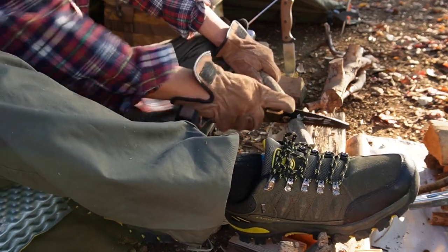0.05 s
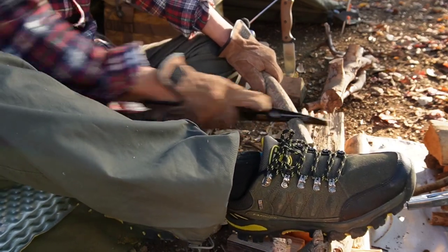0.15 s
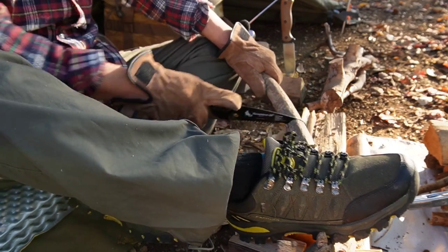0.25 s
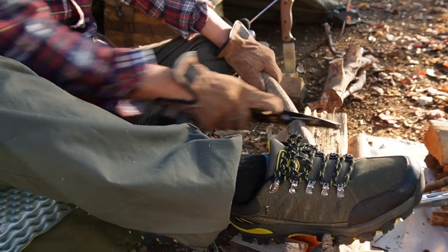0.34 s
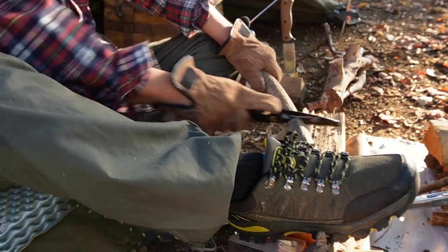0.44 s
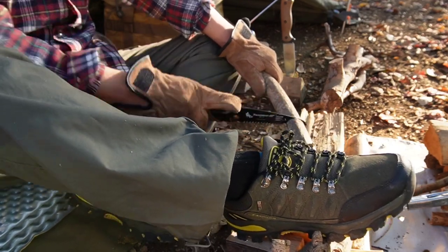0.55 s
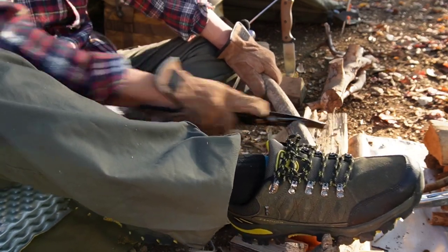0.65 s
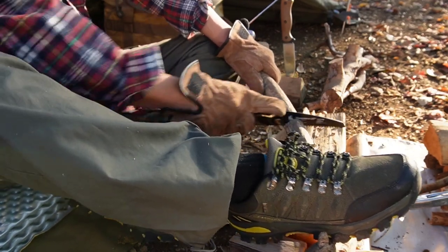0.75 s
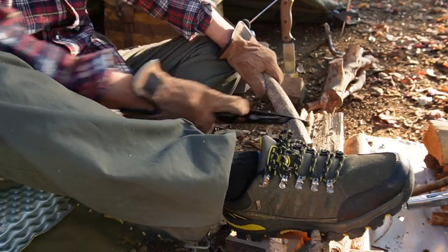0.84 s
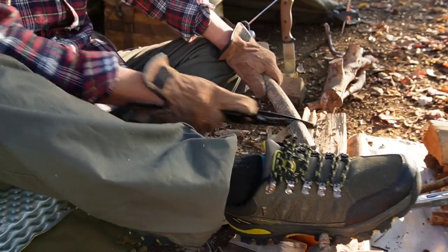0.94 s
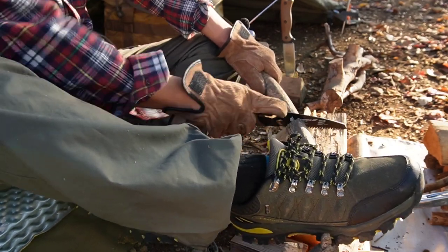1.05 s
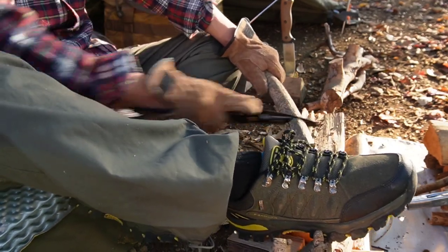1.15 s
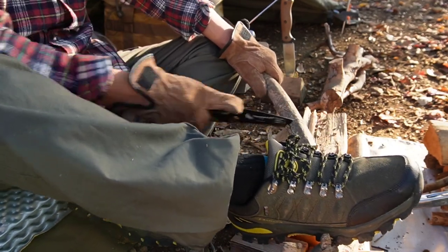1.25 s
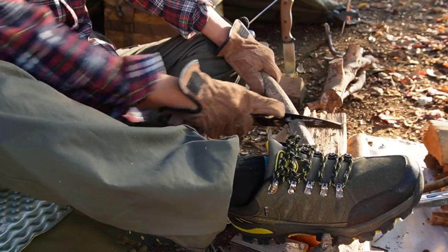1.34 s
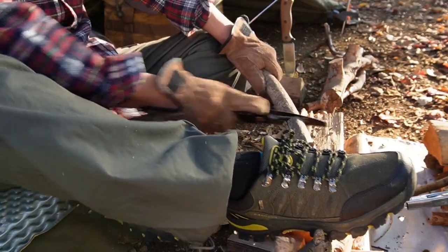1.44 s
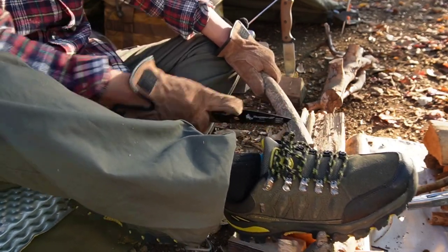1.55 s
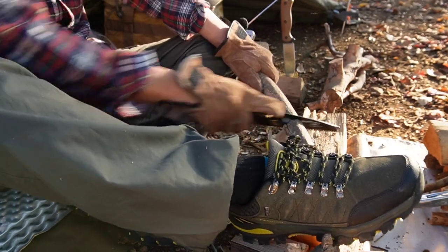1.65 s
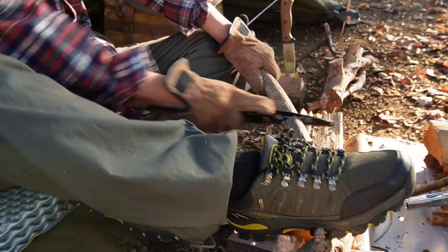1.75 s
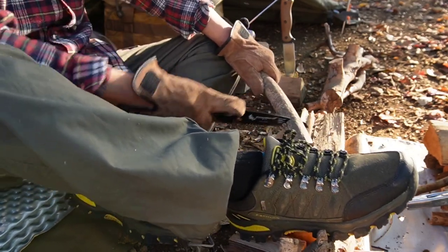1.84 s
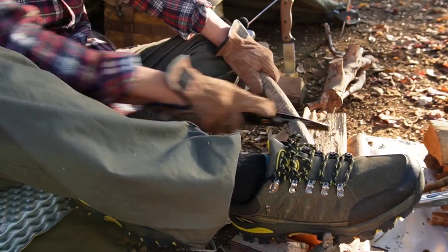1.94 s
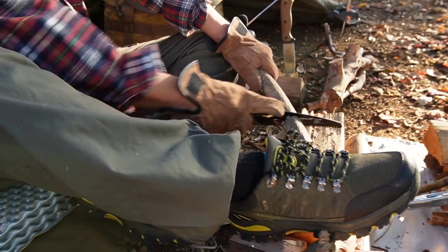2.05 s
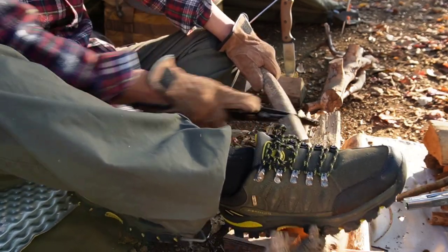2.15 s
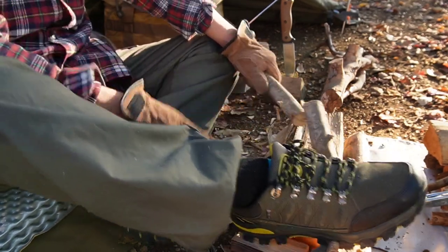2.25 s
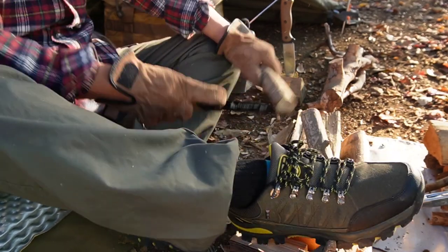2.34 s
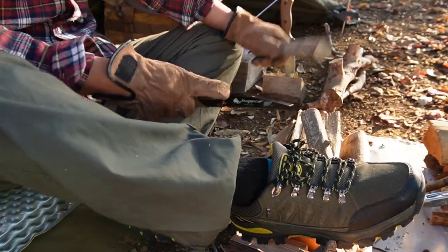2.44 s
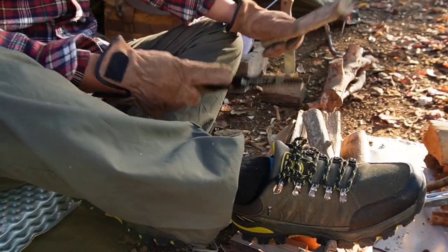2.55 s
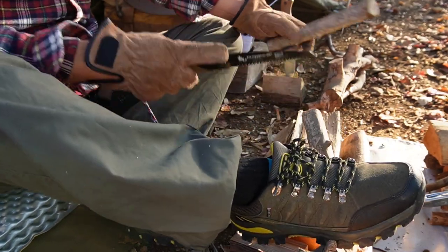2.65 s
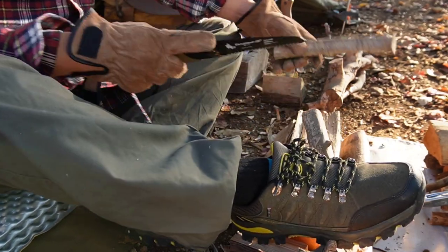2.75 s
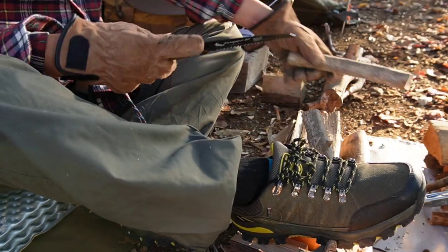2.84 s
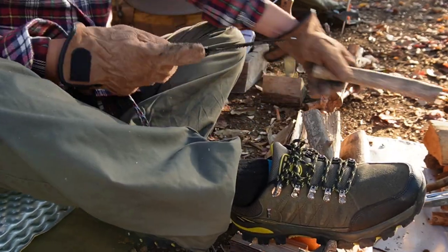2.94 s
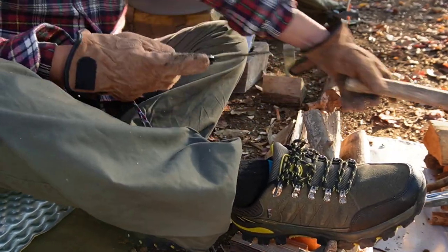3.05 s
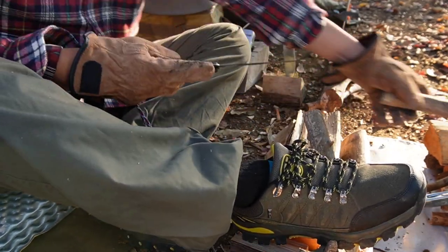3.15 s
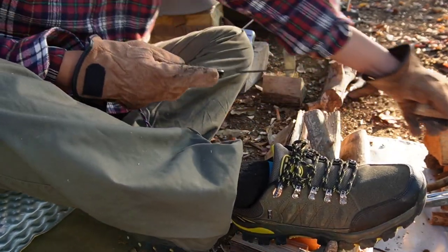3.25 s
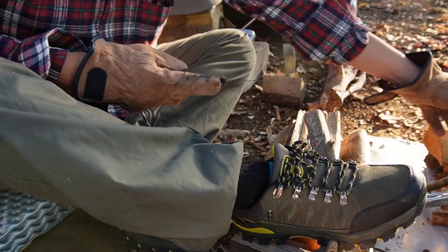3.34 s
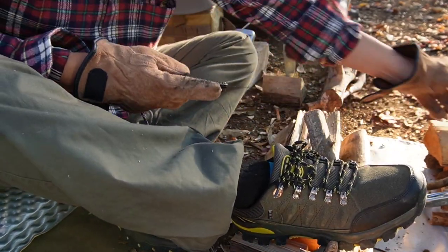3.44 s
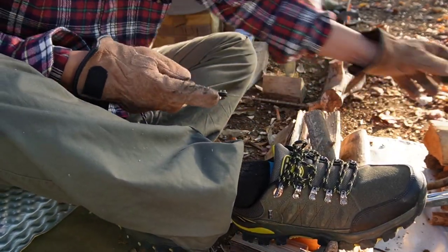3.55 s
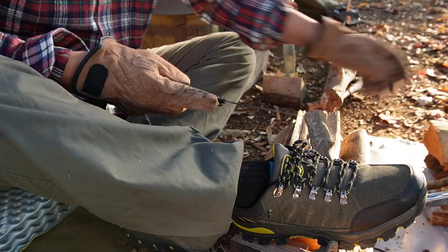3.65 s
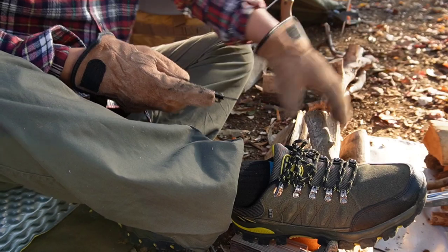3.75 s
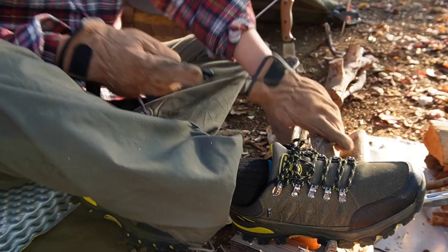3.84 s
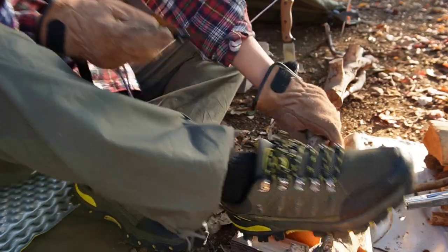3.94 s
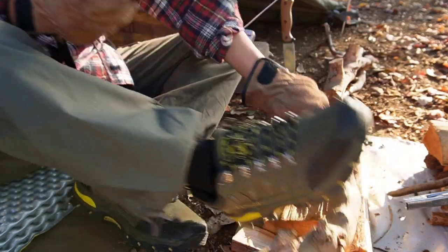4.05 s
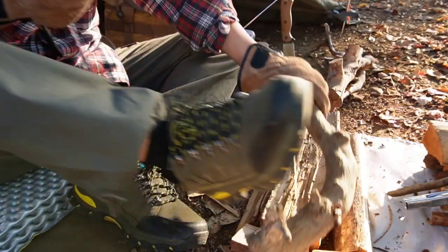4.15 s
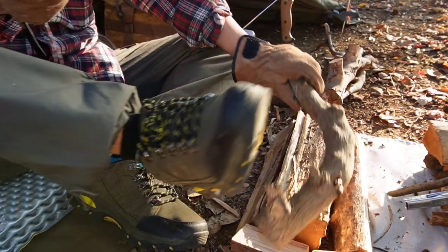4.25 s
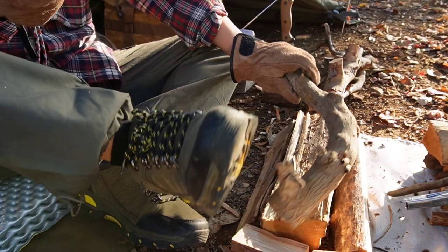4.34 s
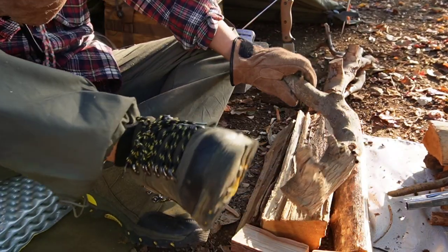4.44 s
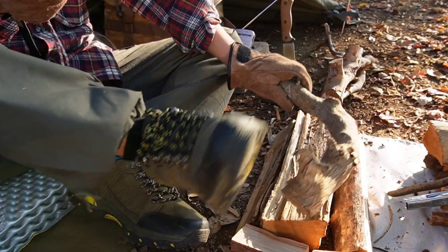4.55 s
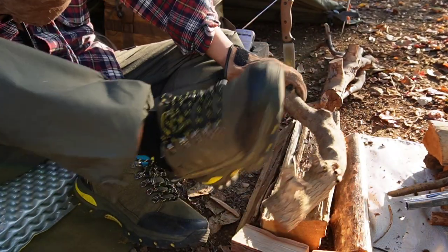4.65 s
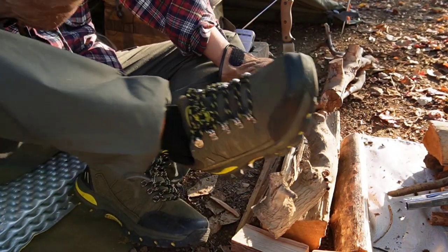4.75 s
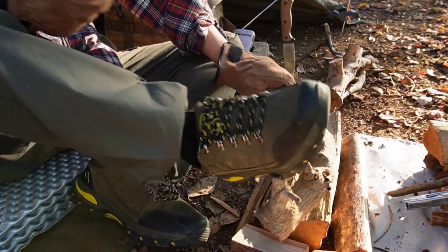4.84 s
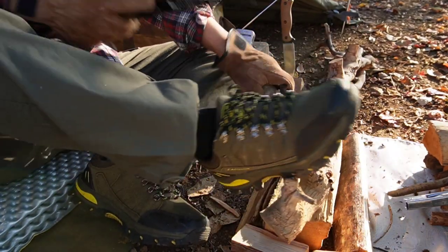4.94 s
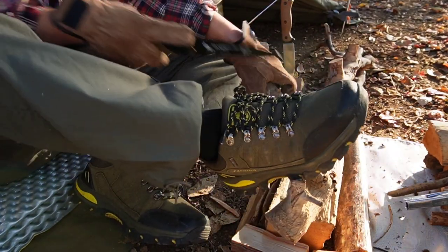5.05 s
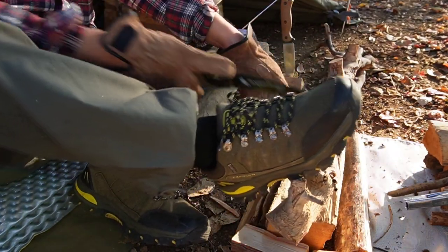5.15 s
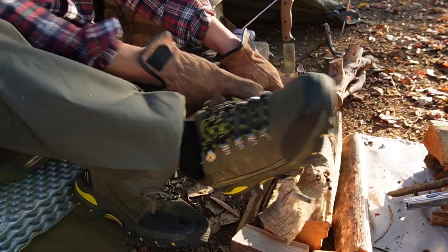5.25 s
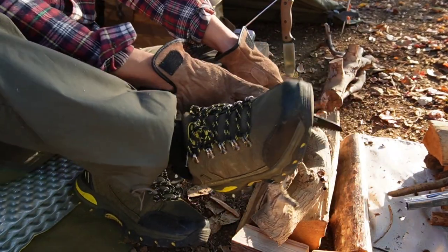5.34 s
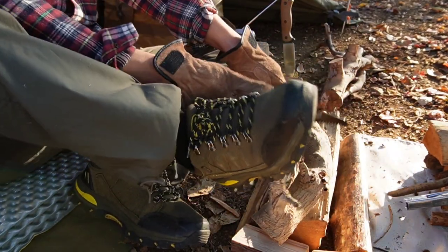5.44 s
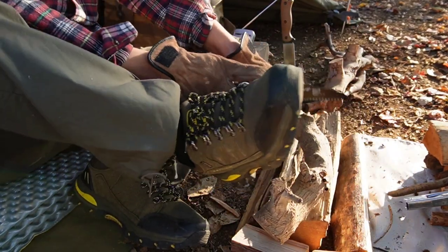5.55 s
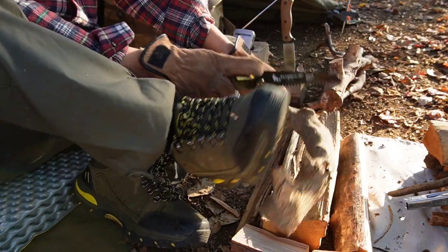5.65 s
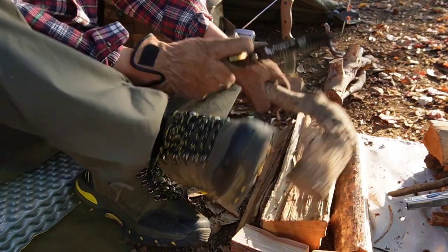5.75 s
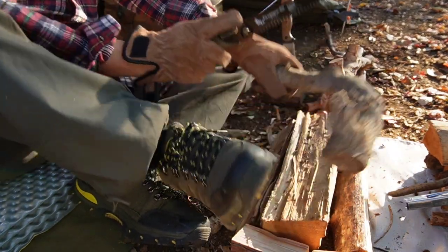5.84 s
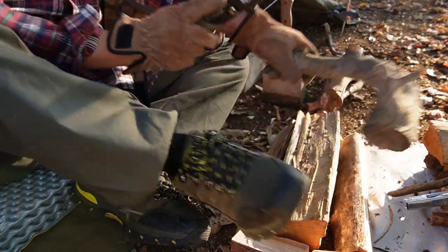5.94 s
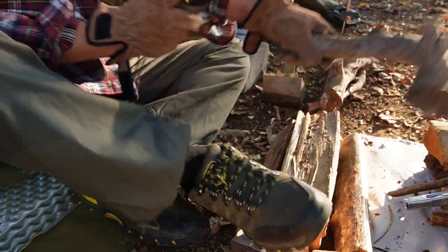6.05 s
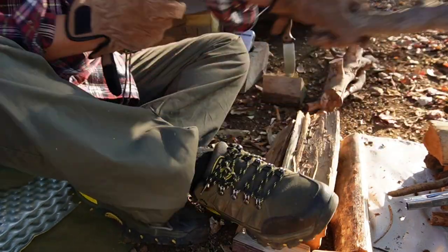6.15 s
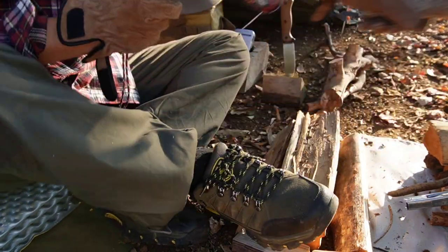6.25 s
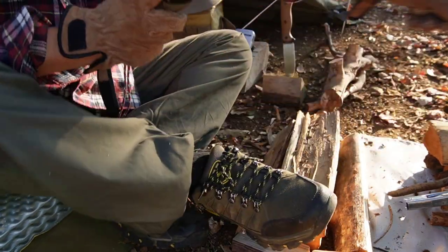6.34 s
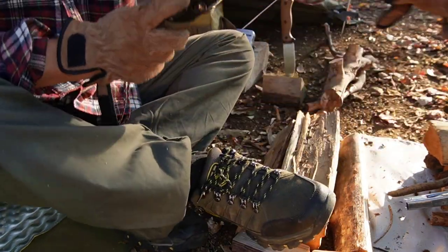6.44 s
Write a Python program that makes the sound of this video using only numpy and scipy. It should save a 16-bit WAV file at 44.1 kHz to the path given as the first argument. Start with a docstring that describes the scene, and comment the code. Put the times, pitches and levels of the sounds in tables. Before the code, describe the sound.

A small hand saw rasps quickly through a dry branch until it cracks, followed by a sharp click and soft rustling of clothes and leaves.

```python
"""Quick, even rasping strokes of a small hand saw in a dry branch, close by, on a woodland floor.
Each tooth tears fibres that excite wood and blade. On the last stroke the blade judders, the wood
cracks and the offcut falls. The saw clicks, the rest of the branch is tossed aside, and clothes and
dry leaves rustle while the next piece is fetched. The trees return a faint echo."""
import sys
import numpy as np
from scipy import signal
from scipy.fft import rfft, irfft
from scipy.io import wavfile

SR = 44100
rng = np.random.default_rng(int(sys.argv[2]) if len(sys.argv) > 2 else 0)


def transcribe(u):
    """Save the signal u as a 16-bit wav file named by the first command-line argument.

    u: samples, shape (n,) or (channels, n), limited to [-1, 1]; the rate is SR.
    q: integer samples, one column per channel.
    """
    v = np.clip(np.atleast_2d(u).T, -1, 1)
    q = np.round(v * 32767).astype(np.int16)
    wavfile.write(sys.argv[1], SR, q)


N = 286197
TIME = np.arange(N) / SR
HZ = np.maximum(np.arange(2049) * SR / 4096, 1)   # filter grid


def sawing(jitter=.055, tooth_depth=.5, chatter_db=1.6, hum_low_hz=210, slide_db=-33, slide_hz=4500):
    """The tooth rate rises and falls with the hand; each tooth tears fibres, exciting branch and blade."""
    strokes = stroke_spans()
    grips, releases = np.transpose(strokes)[:2]
    turns = np.concatenate([[grips[0] - .02], (releases[:-1] + grips[1:]) / 2, [releases[-1] + .04]])
    fibres = grains(spread_db=1.62) * rms_one(from_db(chatter_db * drift(125)))
    wobble = 1 + jitter * drift(65)
    shake, rubbing = from_db(1.95 * drift(40)), from_db(3 * drift(50))
    out = np.zeros(N)
    for k, (grip, release, db, top_hz, hum_db) in enumerate(strokes):
        now = (TIME >= turns[k]) & (TIME < turns[k + 1] + .03)
        t, pulling = TIME[now], k % 2
        speed = half_sine(t, turns[k], turns[k + 1]) ** 1.05
        depth = half_sine(t, grip, release)
        if pulling:   # the teeth dig in over the first half, then the arm slows
            middle = (grip + release) / 2
            hum_db = hum_db + np.interp(t, [grip, middle], [-9, 0])
            speed = speed * np.interp(t, [middle, release], [1, .7])
        bite = from_db(db) * depth ** (.95 if pulling else 1.05)
        tooth_hz = top_hz * speed * wobble[now]
        phase = 2 * np.pi * np.cumsum(tooth_hz) / SR
        tearing = bite * fibres[now] * rms_one(1 + tooth_depth * np.cos(phase))
        travel = np.interp(t, [grip, release], [0, 1])
        early_db = kerf_tone(pulling, grip, pushed_in=pulling)
        late_db = kerf_tone(pulling, release, pushed_in=1 - pulling)
        rasp = colour(tearing * (1 - travel), early_db) + colour(tearing * travel, late_db)
        # evenly spaced teeth shake the thin branch, which radiates little at low rates
        hum = bite * depth ** (.2 if pulling else .8) * shake[now] * from_db(hum_db)
        hum *= np.sin(phase) + from_db(-10) * np.sin(2 * phase)
        hum *= tooth_hz ** 2 / np.hypot(tooth_hz ** 2, hum_low_hz ** 2)
        # out of the bite the blade only rubs, and sounds duller
        rub = np.sqrt(speed) * rubbing[now] * grains(spread_db=2.5, size=len(t))
        slide = from_db(slide_db) * colour(rub, early_db - 10 * np.log10(1 + (HZ / slide_hz) ** 2))
        add(out, t[0], rasp + hum + slide)
    return out + afterring(out)


def stroke_spans(push_s=.117, pull_s=.126, usual_tooth_hz=380):
    """Each stroke's grip and release in s, level in dB, top tooth rate in Hz and hum in dB."""
    # Push and pull in turn. Each row: middle in s, level in dB, top tooth rate in Hz, hum in dB.
    strokes = [(.044, -14.5, 473, -7.5), (.203, -13, 381, -12.5), (.371, -17, 390, -14),
               (.536, -15.5, 345, -19), (.706, -20, 345, -16), (.863, -15, 350, -15), (1.03, -18, 340, -13),
               (1.193, -13.3, 407, -17), (1.353, -16, 365, -12), (1.511, -14.8, 437, -11.5),
               (1.673, -17, 426, -7), (1.825, -14.3, 388, -21), (1.991, -17.5, 360, -13)]
    jammed_pull = (2.13, 2.325, -23.5, 300, -22)
    spans = []
    for k, (middle, db, top_hz, hum_db) in enumerate(strokes):
        length_s = (pull_s if k % 2 else push_s) * (usual_tooth_hz / top_hz) ** .45
        spans.append((middle - length_s / 2, middle + length_s / 2, db, top_hz, hum_db))
    return spans + [jammed_pull]


def kerf_tone(pulling, s, pushed_in, detune=.012, hollow_db_per_s=1.8):
    """Rasp spectrum in dB at time s; the resonances shift with the blade's seat in the kerf."""
    # Tearing fibres. Each row: frequency in Hz, density in dB.
    pull_rasp = [(40, -46), (100, -47), (200, -14), (320, -6), (480, 1.5), (780, -5), (1400, -2.5),
                 (3000, -0.5), (9000, -2), (16000, -7.5)]
    push_rasp = [(40, -32), (120, -32), (200, -34), (320, -5.5), (480, 2), (780, -7), (1400, -0.5),
                 (3000, 0), (4700, -3.5), (8000, -1), (16000, -8)]
    # Branch and blade modes. Each row: centre in Hz, width in Hz, lift on pull and on push in dB.
    saw_modes = [(450, 117, 4, 3.5), (1100, 240, 6.5, 5.5), (1820, 320, 13, 8.5), (2165, 160, 5, 5.5),
                 (2593, 110, 4, 6), (3420, 260, 4, 8.5), (4200, 400, 6.5, 5.5), (5310, 220, 4.5, 4),
                 (5900, 220, 2.5, 1), (6890, 270, 4.5, -2), (12970, 300, 10, 9), (15000, 500, 5, 4.5)]
    # the push cuts less deep and shakes the branch less
    tone = at_hz(pull_rasp) if pulling else at_hz(push_rasp) - 3.5 * bump(430, 400)
    for hz, width_hz, pull_db, push_db in saw_modes:
        lift_db = (pull_db if pulling else push_db) * rng.uniform(.5, 1.4)
        tone += lift_db * bump(hz * (1 + detune * rng.normal()), width_hz)
    blade_db = 8 * bump(11000 if pushed_in else 10150, 600)
    hollow_db = hollow_db_per_s * (s - .9) * bump(950, 800)   # grows as the cut deepens
    return tone + blade_db + hollow_db


def afterring(x, level_db=-8, t60_s=.07):
    """The many close modes of branch and steel hum on for a moment."""
    t = TIME[:SR // 10]
    modes = rng.standard_normal(len(t)) * from_db(-60 * t / t60_s)
    band = HZ / np.hypot(HZ, 450) / np.hypot(1, HZ / 7000)
    return from_db(level_db) * shape(convolve_unit(x, modes), band)


def breaking(snag_s=.006, snag_growth_db=1.2):
    """Teeth catch and fibres snap; on the last pull the blade judders and the branch cracks."""
    # Fibre snaps and the final break. Each row: start in s, level in dB, length in s.
    fibre_snaps = [(.129, -33, .004), (.183, -9, .001), (.303, -23, .009), (.813, -18, .004),
                   (.889, -10, .0008), (1.144, -12, .0012), (1.445, -25, .0025), (1.462, -16, .0035),
                   (1.803, -11.5, .0034), (1.935, -18.5, .003), (2.094, -15, .004), (2.241, -10, .0015),
                   (2.267, -14.5, .0065), (2.295, -19.5, .001)]
    fractures = [(2.198, -5, .003), (2.202, -9, 0.0032)]
    # Their spectra. Each row: frequency in Hz, density in dB.
    snap_colour = [(59, -49), (100, -25), (836, -4), (1720, 2.5), (3250, 3.5), (6420, -0.5), (9020, 1),
                   (15000, -6), (16000, -4)]
    crack_colour = [(60, -50), (300, -22), (1130, -10), (2400, -8), (3400, 2), (5770, -11), (7300, -9),
                    (16000, -20)]
    # Even runs of snags. Each row: start and end in s, first level in dB, period in s.
    judders = [(2.138, 2.194, -15, .0126), (2.221, 2.245, -15, .0092)]
    snags = [(s, db + snag_growth_db * k, snag_s) for start, end, db, period in judders
             for k, s in enumerate(np.arange(start, end, period))]
    snaps, crack = np.zeros(N), np.zeros(N)
    for s, db, length_s in fibre_snaps + snags:
        add(snaps, s, from_db(db) * burst(length_s, tail_t60_s=.052, tail_db=-16))
    for s, db, length_s in fractures:
        add(crack, s, from_db(db) * burst(length_s, tail_t60_s=.069, tail_db=-19))
    return colour(snaps, at_hz(snap_colour)) + colour(crack, at_hz(crack_colour))


def knocks(contact_s=.0046, low_cut_hz=450):
    """Wood on wood: rough bark makes each contact a short scuff, then the branch rings."""
    # Each row: start in s, level in dB, scuff cutoff in Hz, relative ring in dB.
    contacts = [(2.334, -30, 1500, -16), (2.357, -23, 1400, -15), (2.366, -17, 7800, -24),
                (2.409, -32, 5000, -22), (3.4065, -29, 7050, -10), (3.419, -32, 6000, -9),
                (3.435, -24.5, 1500, -4.5), (3.442, -29.5, 5000, 0), (3.465, -37, 4000, -12),
                (3.508, -43, 2500, 7), (3.829, -41, 6000, -15), (5.286, -43, 6000, -16),
                (5.306, -37, 4550, -13)]
    # Each row: frequency in Hz, density in dB.
    scuff_colour = [(50, -50), (300, -17), (650, 0), (1200, 5), (2800, 1), (4000, 4.5), (16000, -8.5)]
    # Each row: frequency in Hz, level in dB, T60 in s.
    branch_modes = [(640, -9, 0.09), (1230, -7, 0.05), (1572, -3, .11), (1922, -2, .076), (2330, -12, .05),
                    (3800, -11.5, 0.09), (4030, -24, .04), (5500, -16, .06)]
    out = np.zeros(N)
    for s, db, cutoff_hz, ring_db in contacts:
        softness_db = -10 * np.log10(1 + (HZ / cutoff_hz) ** 4)
        scuff = burst(contact_s, tail_t60_s=.078, tail_db=-10.5)
        add(out, s, from_db(db) * colour(scuff, at_hz(scuff_colour) + softness_db))
        ringing = shape(ring(branch_modes, spread_db=1), HZ / np.hypot(HZ, low_cut_hz))
        add(out, s + contact_s / 2, from_db(db + ring_db) * ringing)
    return out


def handling(ping_ring_db=-6, ping_t60_s=.1, click_at_s=2.7104, click_db=-7, boot_at_s=6.0695):
    """Twigs and leaves crack, touched steel or hard wood pings, the saw clicks and a boot thuds."""
    # Each row: start in s, level in dB.
    twig_ticks = [(2.517, -35), (2.7562, -35), (4.759, -35), (4.859, -38), (4.894, -28), (4.938, -37),
                  (5.3425, -37), (5.392, -41), (5.6182, -33)]
    # Each row: start in s, level in dB, pitch in Hz.
    pings = [(2.682, -33, 4060), (3.0862, -33, 4550), (3.257, -44, 3400), (3.3634, -37, 3600),
             (3.941, -37, 1970), (4.2015, -45, 4070), (5.312, -33, 3750)]
    # Saw and boot modes. Each row: frequency in Hz, level in dB, T60 in s.
    click_modes = [(1560, -27.5, 0.059), (2680, -8.5, 0.0072), (3360, -16.5, .02), (4030, -6.5, 0.023),
                   (6160, -8.5, .014), (6874, -2, 0.011), (7470, 1, .008), (9700, -8, .007),
                   (13200, -2.5, .005)]
    boot_modes = [(288, 0.012, 0.059), (494, 0, 0.049)]
    out = np.zeros(N)
    for s, db in twig_ticks:
        add(out, s, from_db(db) * tick(hz=4500, width_ratio=.3, lift_db=9, length_s=.002))
    for s, db, hz in pings:
        add(out, s, from_db(db) * tick(hz, width_ratio=.16, lift_db=28, length_s=.0042))
        add(out, s, from_db(db) * ring([(hz, ping_ring_db, ping_t60_s)]))
    add(out, click_at_s, from_db(click_db) * ring(click_modes))
    add(out, boot_at_s, from_db(-34) * shape(ring(boot_modes), bump(410, 370)))
    return out


def tick(hz, width_ratio, lift_db, length_s):
    """A tiny contact with one resonance and no bass."""
    resonance_db = 10 * np.log10(bump(hz, width_ratio * hz) ** 2 + from_db(-lift_db) ** 2)
    bass_cut_db = 10 * np.log10(1 + (900 / HZ) ** 4)
    return colour(burst(length_s, tail_t60_s=.06, tail_db=-15), resonance_db - bass_cut_db)


def scrapes(width_at_1khz_hz=210):
    """Surfaces slide over each other, their fine grains ringing in one narrow resonance."""
    # Each row: middle in s, length in s, level in dB, pitch in Hz.
    slides = [(3.895, .08, -46, 1560), (4.0, .7, -61, 11750), (6.25, .5, -61, 11750),
              (4.07, .09, -52, 4500), (4.95, .65, -53, 1990), (5.0, .2, -54, 5100), (5.31, .05, -43, 3000),
              (5.3, .55, -57, 1190), (5.7, .25, -55, 1520), (5.85, .35, -59, 900), (6.37, .2, -54, 3920)]
    out = np.zeros(N)
    for middle, length_s, db, hz in slides:
        swell = half_sine(TIME[:int(length_s * SR)], 0, length_s)
        resonance = rms_one(bump(hz, width_at_1khz_hz * np.sqrt(hz / 1000)))
        add(out, middle - length_s / 2, from_db(db) * swell * shape(grains(3, len(swell)), resonance))
    return out


def rustle(flutter_db=1.64, crisp_hz=9000):
    """Each movement rubs cloth, bark and leaves in a swell of fine grains."""
    # Each row: start, peak and end in s, level in dB, treble lift in dB.
    movements = [(2.25, 2.42, 3.1, -43.5, -4), (3.2, 3.47, 3.58, -45.5, 1.5),
                 (3.795, 3.82, 4.35, -43.5, 3.5), (4.55, 5.02, 5.55, -44, 2), (5.57, 5.63, 6.05, -47, 1),
                 (5.98, 6.13, 6.3, -42.5, 2), (6.22, 6.38, 6.7, -51, 4)]
    # Each row: frequency in Hz, density in dB.
    rub_colour = [(60, -29), (250, -21), (550, -12.5), (1100, -3.5), (2000, -3), (4500, -2), (7000, -8.5),
                  (16000, -17)]
    out = np.zeros((2, N))
    flutter = from_db(flutter_db * drift(45.7))
    for start, peak, end, db, crisp_db in movements:
        now = (TIME >= start) & (TIME < end)
        swell = np.interp(TIME[now], [start, peak, end], [0, 1, 0])
        tone = at_hz(rub_colour) + crisp_db * np.minimum(HZ / crisp_hz, 1)
        out[:, now] += from_db(db) * swell * flutter[now] * spread_noise(tone, len(swell), grain_db=3)
    return out


def surroundings(x, woods_db=-29.5, woods_t60_s=1.5, near_t60_s=.015, sway_hz=6):
    """Shifting reflections off legs and logs widen the sound; the trees return a faint, long echo."""
    # Each row: frequency in Hz, side over mid in dB.
    stereo_width = [(300, -40), (700, -28), (2800, -19), (5000, -15.5)]
    # Each row: frequency in Hz, echo gain in dB.
    woods_colour = [(100, -20), (400, -10), (1500, -5.5), (4000, -4), (16000, -11.5)]
    near, far = TIME[:SR // 40], TIME[:2 * SR]
    scatter = rng.standard_normal((2, len(near))) * from_db(-60 * near / near_t60_s)
    one, other = [convolve_unit(x, response) for response in scatter]
    sway = 2 * drift(sway_hz)
    side = shape(np.cos(sway) * one + np.sin(sway) * other, from_db(at_hz(stereo_width)))
    envelope = from_db(-60 * far / woods_t60_s) * np.minimum(far / .023, 1)
    trees = rng.standard_normal((2, len(far))) * envelope
    dulled = shape(x, from_db(woods_db + at_hz(woods_colour)))
    echo = np.array([convolve_unit(dulled, response) for response in trees])
    return np.array([x + side, x - side]) + echo


def forest_air(level_db=-53.3):
    """The steady hush of still air."""
    # Each row: frequency in Hz, density in dB.
    air_colour = [(15, -51), (25, -27), (123, -14.5), (290, -13), (450, -6.5), (650, -7), (1440, -1.5),
                  (4870, -3), (6560, -9.5), (12500, -12), (16000, -19)]
    return from_db(level_db) * spread_noise(at_hz(air_colour), N, grain_db=0)


def spread_noise(db, size, grain_db):
    """Stereo noise, less alike left and right towards the treble."""
    # Each row: frequency in Hz, left-right correlation.
    likeness = [(60, 0.99), (380, 0.83), (2380, 0.78), (15000, 0.47)]
    alike, gain = np.clip(at_hz(likeness), 0, .99), rms_one(from_db(db))
    mid = shape(grains(grain_db, size), gain * np.sqrt((1 + alike) / 2))
    side = shape(grains(grain_db, size), gain * np.sqrt((1 - alike) / 2))
    return np.array([mid + side, mid - side])


def burst(length_s, tail_t60_s, tail_db):
    """A cluster of fractures that swells, stops and leaves a short tail."""
    t = TIME[:SR // 8]
    progress = t / max(length_s, 1e-4)
    envelope = np.minimum(3 * progress, 1) * np.exp(-3 * np.maximum(progress - 1, 0))
    return rng.standard_normal(len(t)) * (envelope + from_db(tail_db - 60 * t / tail_t60_s))


def ring(modes, spread_db=0):
    """Decaying modes after one blow."""
    t = TIME[:SR // 4]
    return sum(from_db(db + spread_db * rng.normal() - 60 * t / t60_s)
               * np.sin(2 * np.pi * hz * t) * (-1) ** k for k, (hz, db, t60_s) in enumerate(modes))


def grains(spread_db, size=N):
    """White crackle: tiny clicks of uneven size."""
    return rms_one(rng.standard_normal(size) * from_db(spread_db * np.minimum(rng.exponential(1, size), 5)))


def drift(rate_hz):
    """Slow random wander of rms 1."""
    pole = np.exp(-2 * np.pi * rate_hz / SR)
    return rms_one(signal.lfilter([1], [1, -2 * pole, pole * pole], rng.standard_normal(N + SR))[SR:])


def shape(x, gain):
    """Minimum-phase filter with the given gain over HZ."""
    cepstrum = irfft(np.log(gain + 1e-6))
    half = len(gain) - 1
    cepstrum[1:half] *= 2
    cepstrum[half + 1:] = 0
    return signal.oaconvolve(x, irfft(np.exp(rfft(cepstrum)))[:half])[:len(x)]


def colour(x, db):
    """Colour a white signal and keep its power."""
    return shape(x, rms_one(from_db(db)))


def convolve_unit(x, response):
    """Convolve with a response scaled to unit energy."""
    return signal.oaconvolve(x, response / np.linalg.norm(response))[:N]


def at_hz(points):
    """Interpolate a table onto HZ."""
    hz, value = np.transpose(points)
    return np.interp(np.log(HZ), np.log(hz), value)


def bump(hz, width_hz):
    """Bell of a resonance, 1 at its centre."""
    return 1 / (1 + (2 * (HZ - hz) / width_hz) ** 2)


def half_sine(t, start, end):
    """Rise from 0 to 1 and back between two times."""
    return np.maximum(np.sin(np.pi * np.clip((t - start) / (end - start), 0, 1)), 0)


def from_db(db):
    """Decibels to gain."""
    return 10 ** (np.asarray(db) / 20)


def rms_one(x):
    """Scale to rms 1."""
    return x / np.sqrt(np.mean(x ** 2) + 1e-20)


def add(out, s, sound):
    """Mix a sound in at time s."""
    at = int(s * SR)
    out[at:at + len(sound)] += sound[:N - at]


def scene():
    """The work is straight ahead, a touch to the right."""
    work = sawing() + breaking() + knocks() + handling() + scrapes()
    return (surroundings(work) + forest_air() + rustle()) * from_db([[-.2], [.2]])


def record(dry):
    """The loudest cracks overload; rumble and the very top are cut."""
    low_cut = signal.butter(2, 60, "high", fs=SR, output="sos")
    top_cut = signal.ellip(10, .1, 70, 16000, fs=SR, output="sos")
    return signal.sosfilt(np.vstack([low_cut, top_cut]), np.clip(dry, -1, 1))


dry = scene()
out = record(dry)
transcribe(out)
```